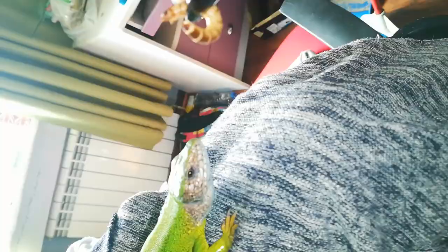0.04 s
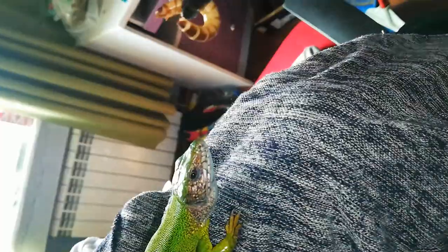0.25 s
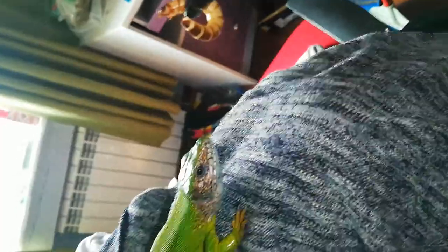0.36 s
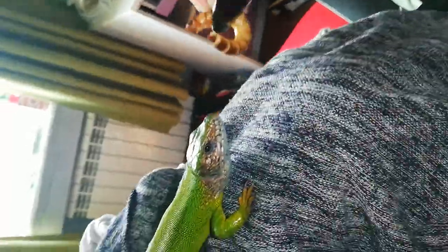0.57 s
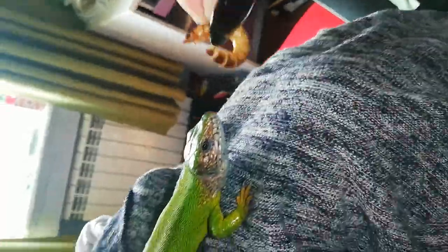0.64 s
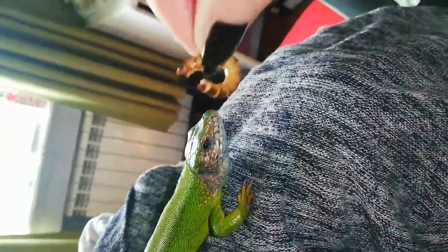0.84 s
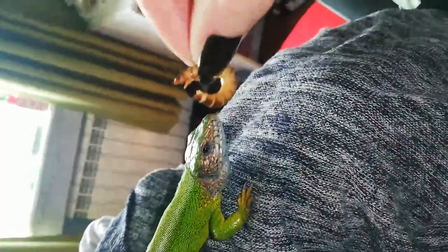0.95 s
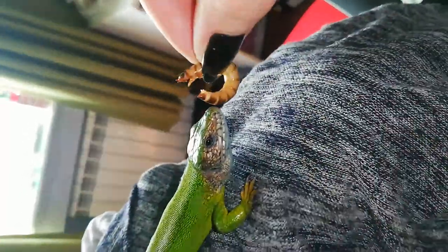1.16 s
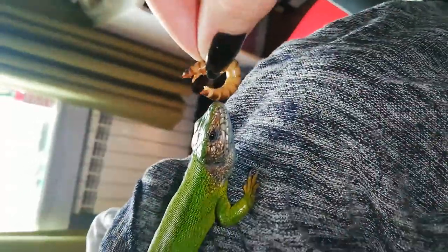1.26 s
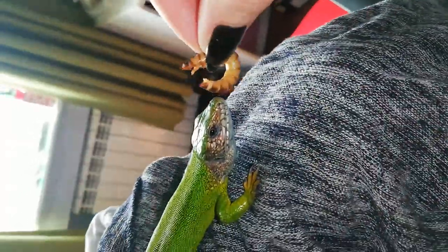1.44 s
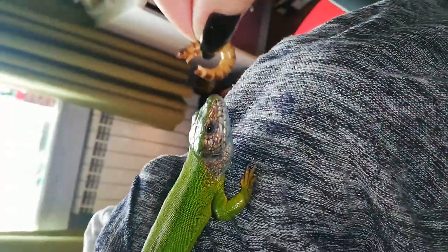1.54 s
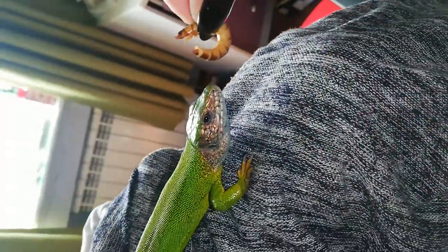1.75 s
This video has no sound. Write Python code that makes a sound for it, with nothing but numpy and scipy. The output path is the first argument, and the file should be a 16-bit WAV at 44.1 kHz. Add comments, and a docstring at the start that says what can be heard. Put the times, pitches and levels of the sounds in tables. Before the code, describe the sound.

Faint room noise fills a quiet indoor space. It begins with one sharp click as the microphone switches on, then carries on as a low rumble, a wavering hum and a soft hiss.

```python
"""A quiet room where a lizard is offered a grub without a sound. First there is silence.
At about 0.22 s the microphone switches on with a click and an offset that drains away.
From then on it hears its own hiss, a soft wash of air, a low building rumble and a wavering hum
with faint tones that come and go. Near the end a thin, high sizzle flutters on the left."""
import sys
import numpy as np
from scipy import signal
from scipy.fft import rfft, irfft
from scipy.io import wavfile
from scipy.ndimage import uniform_filter1d

SR = 44100
rng = np.random.default_rng(int(sys.argv[2]) if len(sys.argv) > 2 else 0)


def digitize_waveform(pressure):
    """Quantize a signal to 16-bit integers and store it at the path in sys.argv[1].

    Rows of a 2-D input are taken as channels; values are limited to [-1, 1].
    """
    field = np.atleast_2d(pressure).T
    bounded = np.clip(field, -1, 1)
    quanta = np.round(bounded * 32767).astype(np.int16)
    wavfile.write(sys.argv[1], SR, quanta)


N = 79380
T = np.arange(N) / SR
PITCHES_HZ = np.arange(N // 2 + 1) * SR / N


def undb(db):
    """Turn decibels into a number to multiply by."""
    return 10 ** (np.asarray(db) / 20)


def over_time(rows):
    """Join (time_s, value) rows with straight lines."""
    return np.interp(T, *np.array(rows).T)


def over_pitch(rows):
    """Join (pitch_hz, value) rows with straight lines, giving each octave equal room."""
    hz, value = np.array(rows).T
    return np.interp(np.log(PITCHES_HZ + 1e-9), np.log(hz), value)


def colour(rows):
    """Turn (pitch_hz, relative_db) rows into a gain for each pitch, with average power 1."""
    gain = undb(over_pitch(rows))
    return gain / np.sqrt(np.mean(gain ** 2))


def noise(gain):
    """Noise with each pitch scaled by its gain."""
    return irfft(rfft(rng.standard_normal(N)) * gain, N)


def drift(rate_hz):
    """A smooth random wobble, mostly between -1 and 1."""
    hold = int(SR / rate_hz)
    steps = np.repeat(rng.standard_normal(N)[:N // hold + 1], hold)
    return 1.3 * uniform_filter1d(uniform_filter1d(steps, hold), hold)[:N]


def pan(left_db):
    """Left and right gains that make the left louder by left_db."""
    return undb(np.array([[left_db], [-left_db]]) / 2)


def tone(hz, wander):
    """A pure tone whose pitch strays by about the fraction wander."""
    cycles = np.cumsum(hz * (1 + wander * drift(12))) / SR
    return np.sqrt(2) * np.sin(2 * np.pi * (cycles + rng.random()))


# How strong the hiss is from low to high: pitch_hz, relative_db
HISS_COLOUR = [(500, 4.5), (5000, 1), (8000, -2.5), (9700, -1), (11000, -5), (13000, -5.5), (16000, -7.5)]

def microphone_hiss(level_db=-68.5):
    """Each side of the microphone makes its own steady hiss."""
    sides = np.array([noise(colour(HISS_COLOUR)) for _ in range(2)])
    return sides * pan(left_db=0.5) * undb(level_db)


# How loud the sizzle is: time_s, level_db
SIZZLE_LOUDNESS = [(.25, -81), (1.1, -79), (1.4, -80), (1.49, -70), (1.55, -76), (1.62, -73), (1.68, -79),
                   (1.74, -71), (1.8, -84)]

def microphone_sizzle(pitch_hz=9400, width_hz=310):
    """A narrow, high band of hiss that grows and flutters, on the left only."""
    band = 1 / np.hypot(1, 2 * (PITCHES_HZ - pitch_hz) / width_hz)
    band /= np.sqrt(np.mean(band ** 2))
    left = noise(band) * undb(over_time(SIZZLE_LOUDNESS))
    return np.array([left, np.zeros(N)])


def wall_echoes(echo_db=-8, decay_s=0.035):
    """A gain for each pitch: short echoes join the direct sound, lifting some and lowering others."""
    tail = rng.standard_normal(N) * np.exp(-T / decay_s)
    echoes = undb(echo_db) * rfft(tail / np.linalg.norm(tail))
    return (1 + echoes) / np.hypot(1, undb(echo_db))


# How strong the air is from low to high: pitch_hz, relative_db
AIR_COLOUR = [(30, -9), (110, 1.5), (230, -4.5), (350, 5), (520, -2), (680, 1), (820, -0.5), (1200, -2),
              (1700, -4.5), (2200, -11), (4200, -14.5), (5500, -20), (9000, -16.5), (16000, -36)]
# How alike the air is left and right: pitch_hz, likeness (1 same, 0 unrelated, -1 opposite)
AIR_LIKENESS = [(100, -0.096), (350, -0.86), (600, -0.65), (800, -0.42), (1200, 0.16), (1700, 0.098),
                (2300, -0.069), (4000, -0.088), (10000, -0.13)]

def room_air(level_db=-61):
    """A soft wash from all around, coloured by the walls and only partly alike on the two sides."""
    likeness = over_pitch(AIR_LIKENESS)
    gain = colour(AIR_COLOUR)
    shared = noise(gain * wall_echoes() * np.sqrt((1 + likeness) / 2))
    opposed = noise(gain * wall_echoes() * np.sqrt((1 - likeness) / 2))
    return np.array([shared + opposed, shared - opposed]) * pan(left_db=1.5) * undb(level_db)


# Tones that come and go: pitch_hz, level_db, start_s, end_s
FAINT_TONES = [(331.8, -66, .1, 1.53), (373.4, -68, 1.3, 1.9), (59.1, -58, 1.2, 1.9), (135, -56, 1.33, 1.9),
               (866, -80.5, .1, 0.94), (1164, -78.5, 1.49, 1.9)]

def faint_tones(fade_s=0.096, waver_db=1.5):
    """Quiet tones above and below the hum waver; each is half faded at its start and end times."""
    out = np.zeros(N)
    for pitch_hz, level_db, start_s, end_s in FAINT_TONES:
        fade = np.clip(np.minimum(T - start_s, end_s - T) / fade_s + 0.5, 0, 1)
        out += tone(pitch_hz, wander=0.004) * fade * undb(level_db + waver_db * drift(8.75))
    return out


# How strong the rumble is from low to high: pitch_hz, relative_db
RUMBLE_COLOUR = [(20, -8.5), (35, -3.5), (48, -5), (62, 3), (82, -2), (100, -2), (135, -5.5), (160, -14.5),
                 (220, -10.5), (260, -13.5), (308, -8.5), (350, -16.5), (400, -23), (480, -26), (800, -38),
                 (3000, -94)]
# How the rumble rises and falls: time_s, change_db
RUMBLE_SWELL = [(.25, -0.5), (.55, 1.5), (.8, 0), (1.05, 0), (1.28, 1), (1.42, -1), (1.6, 0), (1.8, -1)]

def building_rumble(level_db=-52):
    """The building's low noise swells slowly, the same on both sides."""
    return noise(colour(RUMBLE_COLOUR)) * undb(level_db + over_time(RUMBLE_SWELL))


# How loud the hum is: time_s, level_db
HUM_LOUDNESS = [(.25, -54), (.44, -50.5), (.53, -56), (.6, -47.5), (.68, -52.5), (.8, -59), (.9, -47.5),
                (1.06, -48), (1.13, -55.5), (1.2, -61), (1.34, -51.5), (1.56, -57.5), (1.7, -68)]

def hum(pitch_hz=123):
    """One low tone that wavers in pitch and loudness."""
    return tone(pitch_hz, wander=0.007) * undb(over_time(HUM_LOUDNESS))


def pulse(start_s, rise_s, decay_s):
    """A single push that builds up and dies away."""
    age_s = np.maximum(T - start_s, 0)
    return (1 - np.exp(-age_s / rise_s)) * np.exp(-age_s / decay_s)


def switch_on_click(start_s, left_db=-18, right_db=-27.5, offset_db=-22):
    """Switching on makes a sharp downward spike, then an offset: a shift below zero that drains away."""
    spike = undb([[left_db], [right_db]]) * pulse(start_s, rise_s=0.00003, decay_s=0.0005)
    offset = undb(offset_db) * pulse(start_s + 0.00047, rise_s=0.00045, decay_s=0.094)
    return -spike - offset


def scene():
    """The room and the microphone's own noise, left and right."""
    room = building_rumble() + hum() + faint_tones() + room_air()
    return room + microphone_hiss() + microphone_sizzle()


def record(dry, on_s=0.2245, top_hz=15700):
    """Silence until the microphone clicks on; pitches above top_hz are cut away."""
    live = dry * (T >= on_s) + switch_on_click(on_s)
    treble_cut = signal.ellip(10, 0.1, 70, top_hz, fs=SR, output="sos")
    return signal.sosfilt(treble_cut, live)


dry = scene()
out = record(dry)
digitize_waveform(out)
```